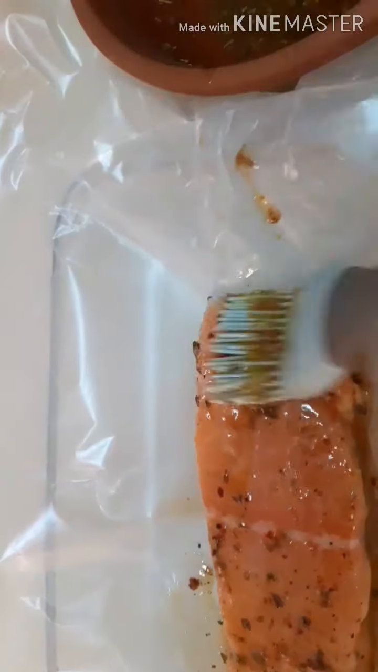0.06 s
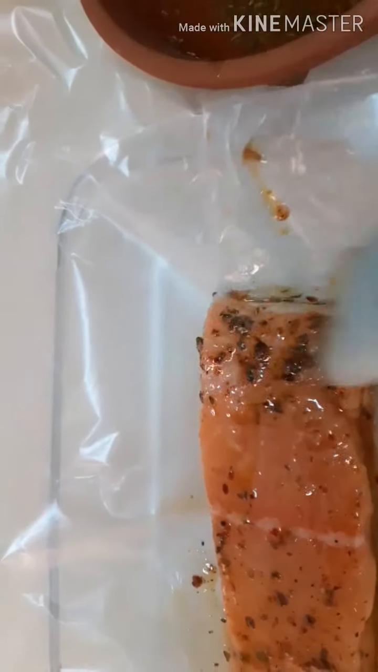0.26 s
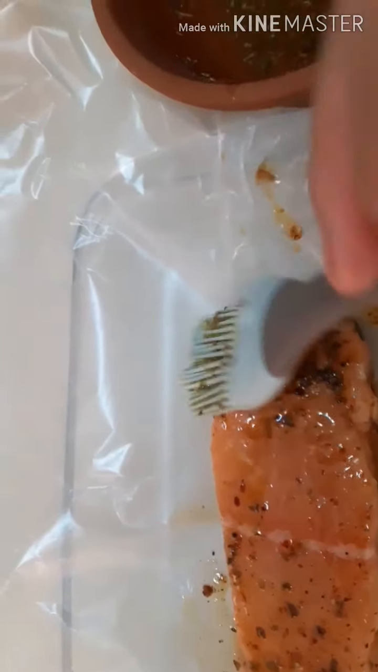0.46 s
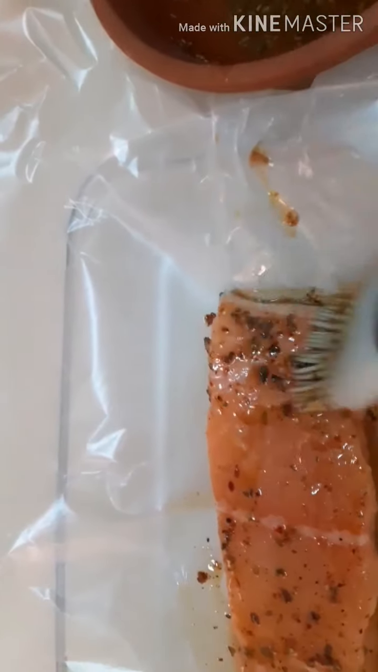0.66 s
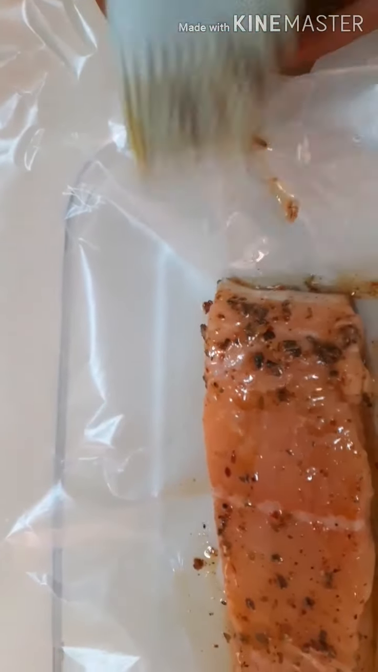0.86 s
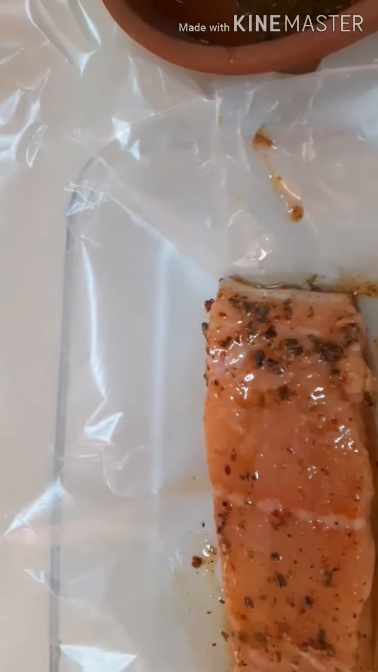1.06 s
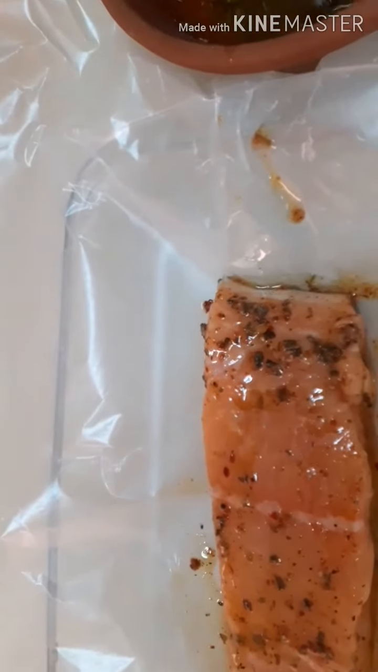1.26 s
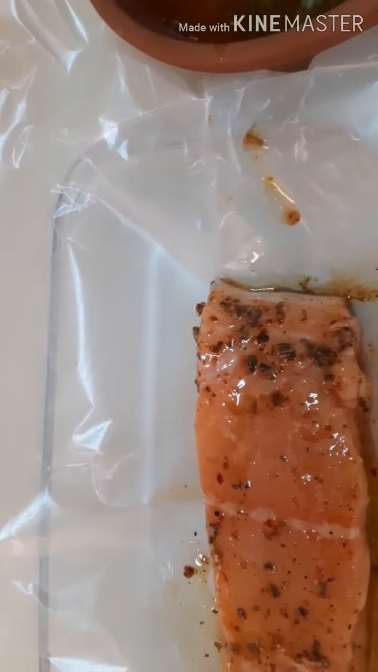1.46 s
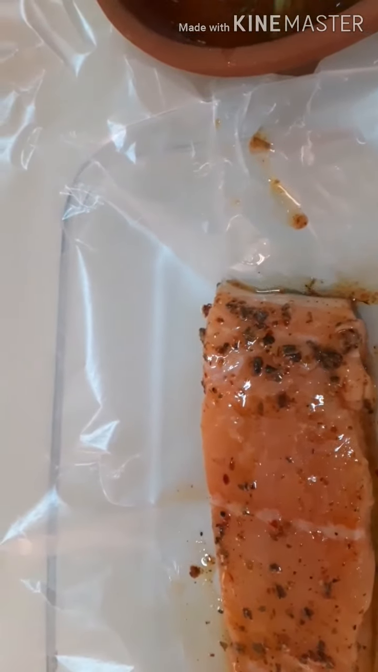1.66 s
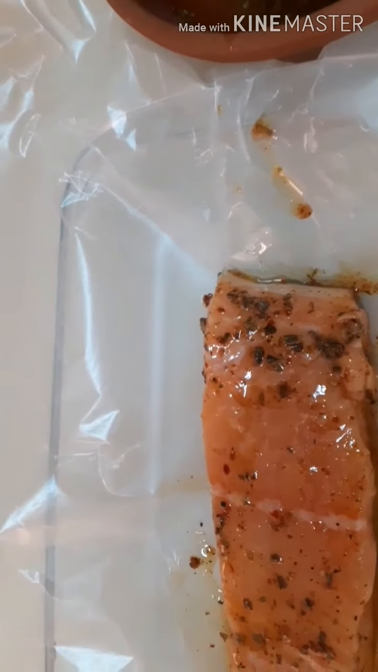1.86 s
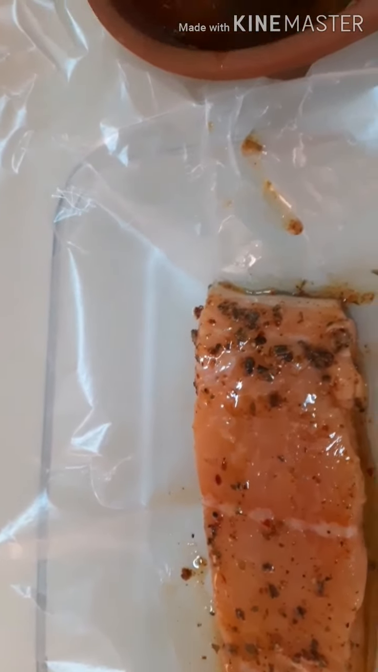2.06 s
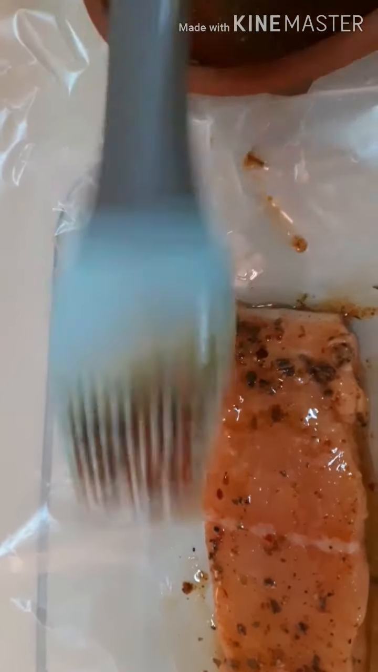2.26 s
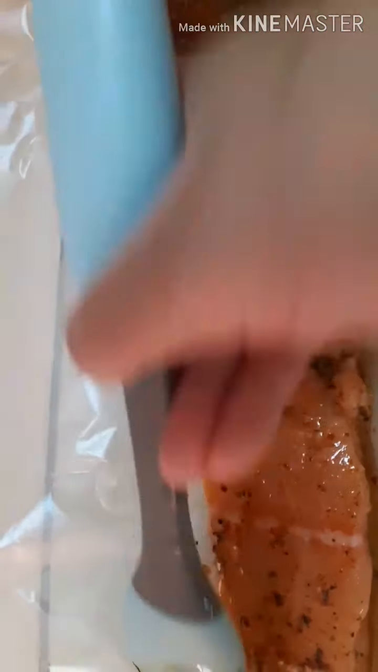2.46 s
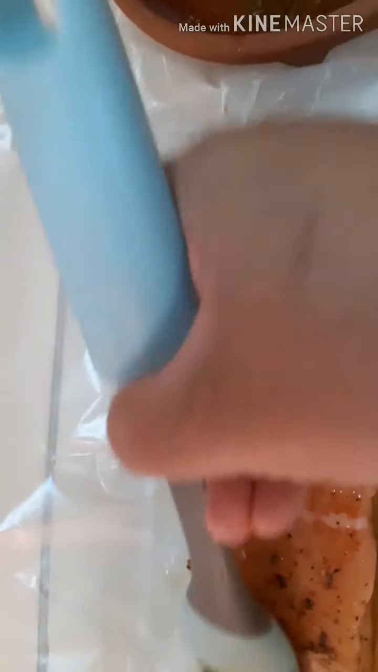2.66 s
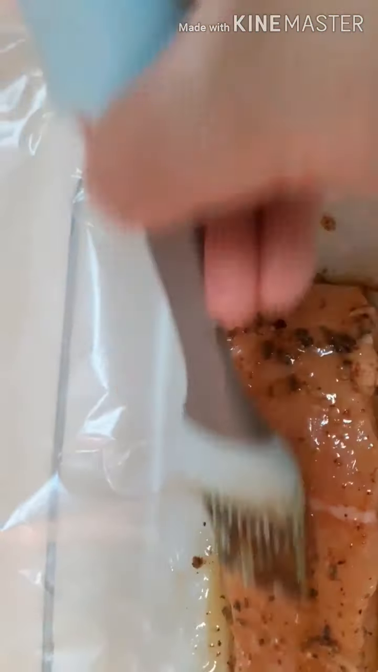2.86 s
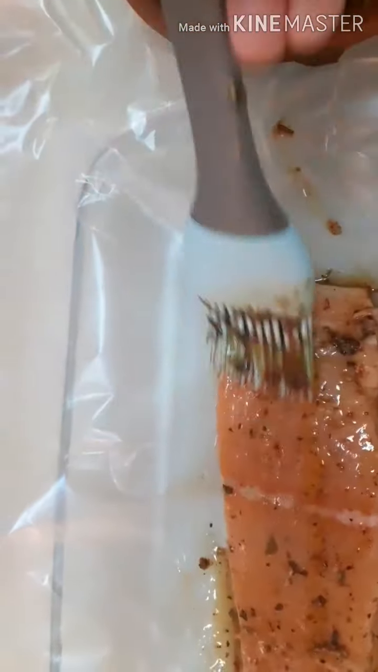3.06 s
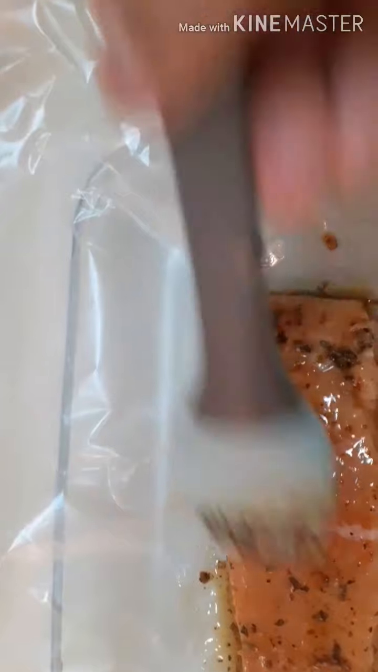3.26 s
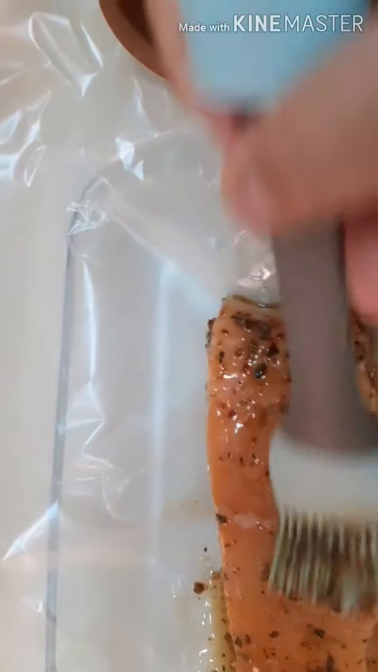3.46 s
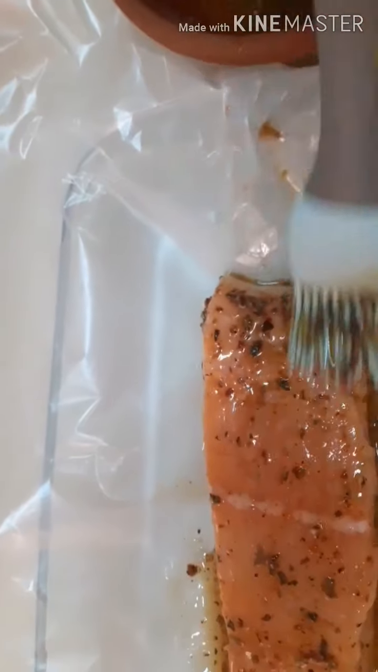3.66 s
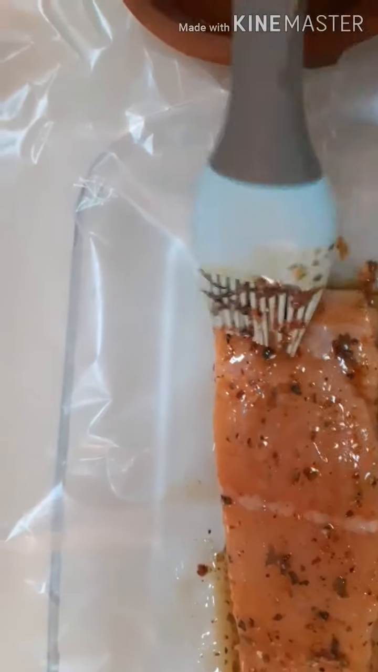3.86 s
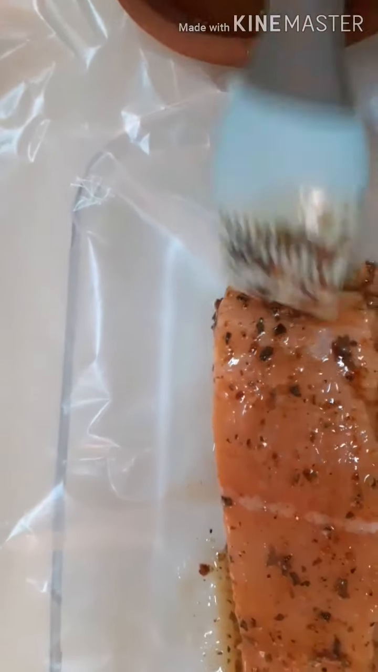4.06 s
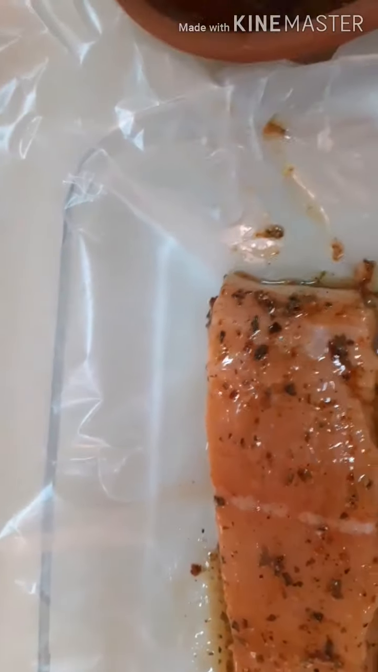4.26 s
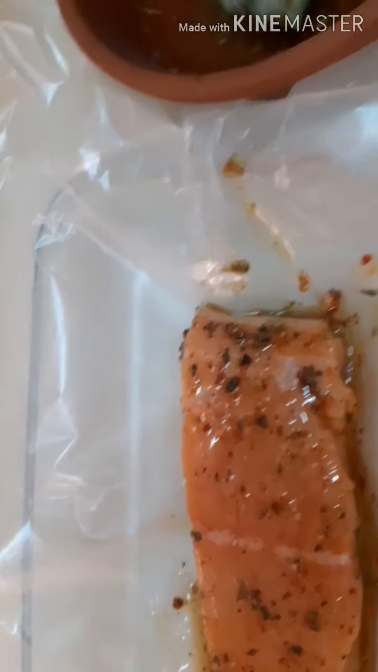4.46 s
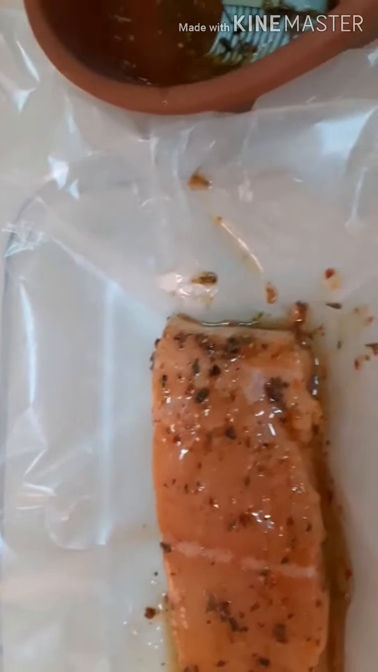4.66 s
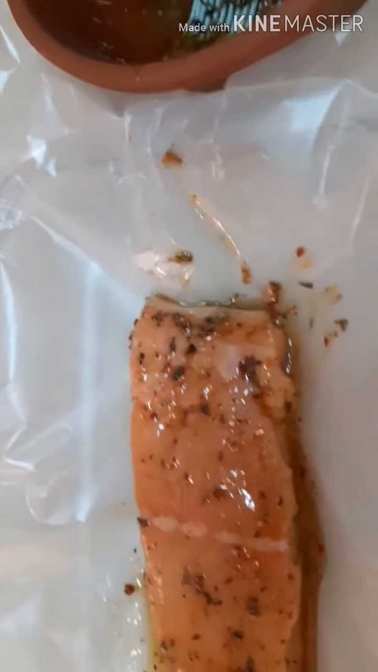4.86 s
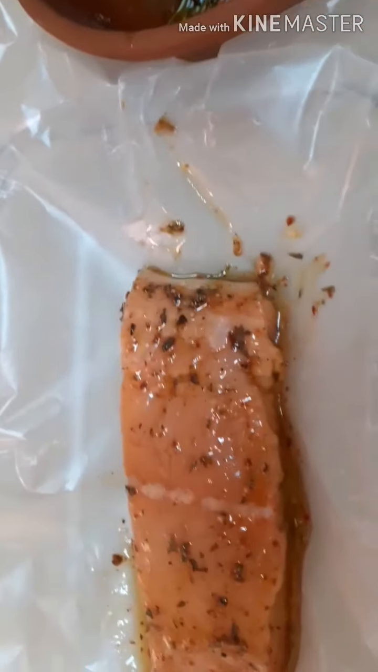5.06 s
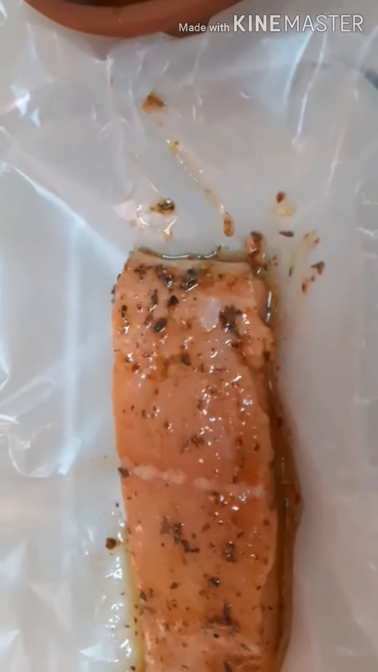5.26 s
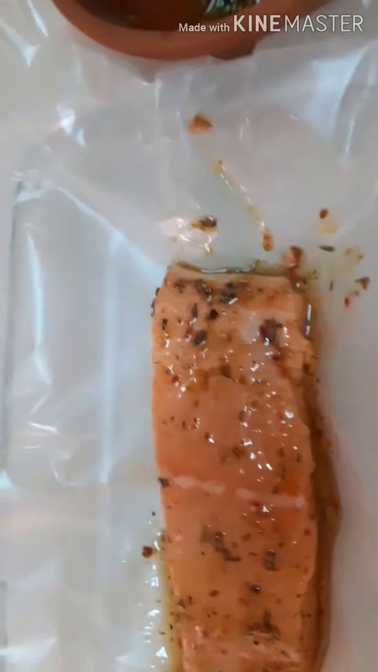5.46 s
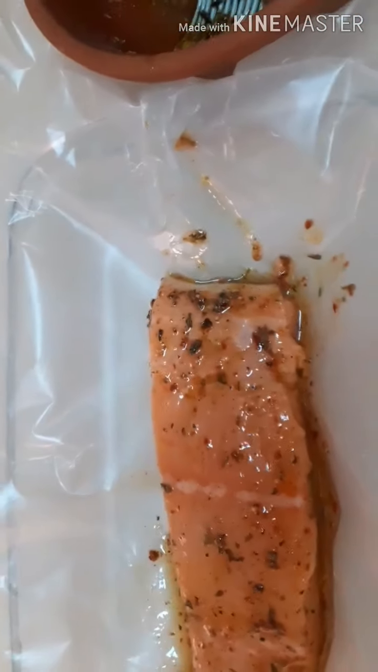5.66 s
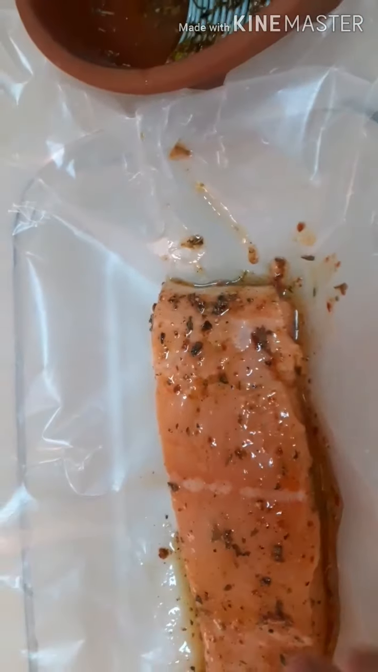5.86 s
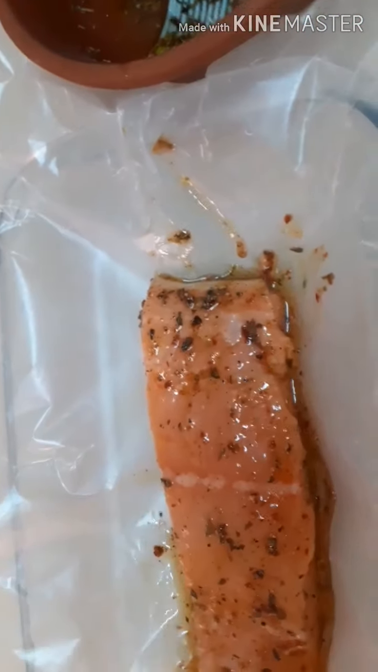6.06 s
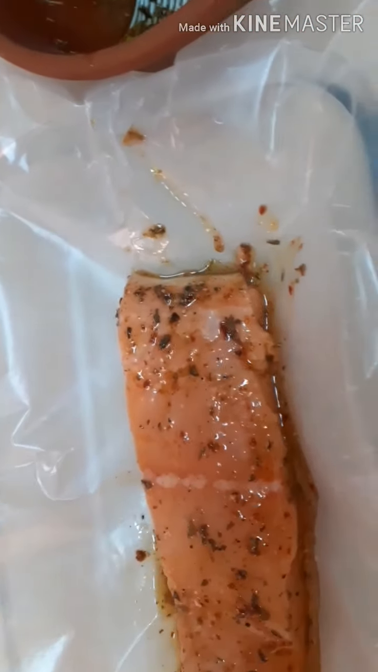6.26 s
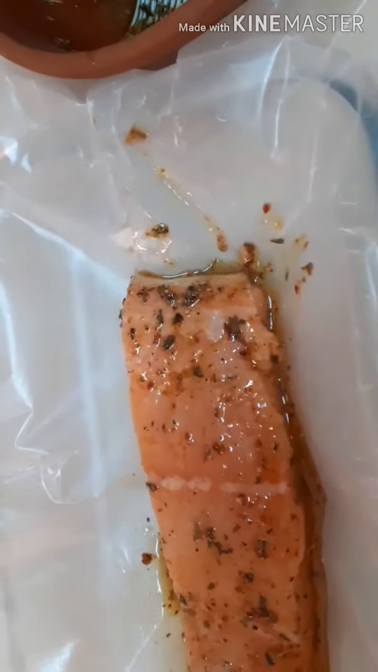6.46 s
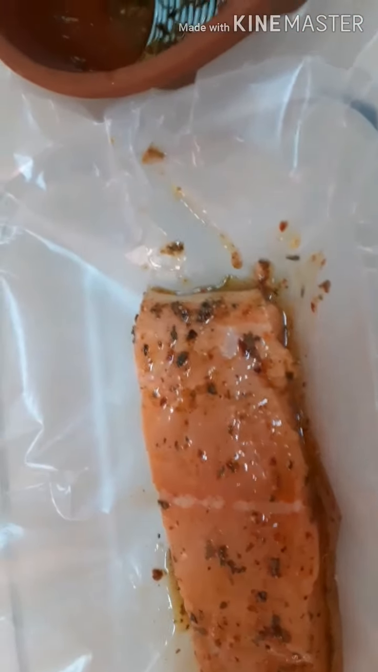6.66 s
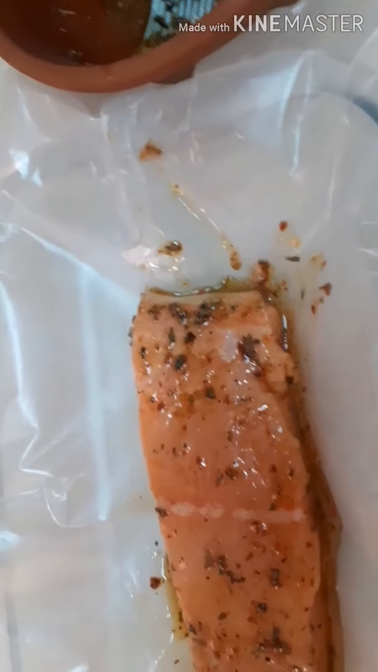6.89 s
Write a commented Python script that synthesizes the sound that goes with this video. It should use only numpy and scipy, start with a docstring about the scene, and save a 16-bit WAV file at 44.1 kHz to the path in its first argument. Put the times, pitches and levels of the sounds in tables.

```python
"""Brushing a fish fillet on plastic film

A silicone brush dabs marinade on a fillet; the film under it crinkles by random creasing and snaps by buckling.
Slaps and thuds are short noise bursts; the clay bowl that receives the brush rings as a sum of damped modes.
Tugs then pull the film along, as crackle and low rumble. Small bubbles ring, and an appliance hums below.
A close phone hears it in a small hard room; its right microphone port resonates near 2 kHz."""
import sys
import numpy as np
from scipy import signal
from scipy.fft import rfft, irfft
from scipy.io import wavfile
from scipy.ndimage import uniform_filter1d

SR = 44100
rng = np.random.default_rng(int(sys.argv[2]) if len(sys.argv) > 2 else 0)


def unload_audio(sound):
    """Save the sound as a 16-bit wav file, at the path given as the first command line argument."""
    columns = np.transpose(np.atleast_2d(sound))
    # keep every value between -1 and 1, then stretch to whole-number steps
    steps = np.round(np.clip(columns, -1, 1) * 32767)
    wavfile.write(sys.argv[1], SR, steps.astype(np.int16))


N = 305348
T = np.arange(N) / SR  # time in s

# spectrum of sliding film: f/Hz, level/dB
SLIDING_FILM = [(60, -27), (500, 1.5), (1000, 5), (1700, 1.5), (3000, 0.5), (6000, -7), (9000, -3),
                (13000, -6), (16000, -0.5)]


def brushing(folds_db=-4):
    """Stick and slip: bristles drag over the wet fillet and crumple the film beside it."""
    # strokes that crease the film: firmest at t/s, lead-in/s, trail/s, level/dB, treble gain/dB
    stroke_rows = [(0.189, 0.12, 0.11, -39.5, -12), (0.60, 0.15, 0.037, -49.5, -1.5),
                   (2.66, 0.14, .16, -46, 1.5), (3.07, 0.024, 0.14, -63.5, -1), (3.67, 0.13, 0.12, -47, -2)]
    crackle = mottle(creases(per_s=980, spread_db=2.0, hiss_db=4.0), depth_db=2.5)
    crackle = crackle + undb(folds_db) * small_folds(per_s=100, spread_db=39)
    strokes = 0
    for s, lead_s, trail_s, db, treble_db in stroke_rows:
        strokes = strokes + brighten(crackle, treble_db) * press(s, lead_s, trail_s, db)
    return tint(strokes, SLIDING_FILM)


def press(s, lead_s, trail_s, db, touch_db=-15, lift_db=-13.5, edge_s=0.0049):
    """Friction follows load: pressure grows from first contact to its firmest, eases, and the bristles lift."""
    swell_db = np.interp(T, [s - lead_s, s, s + trail_s], [touch_db, 0, lift_db])
    outside_s = np.maximum(np.maximum(s - lead_s - T, T - s - trail_s), 0)
    # the bristles take a moment to bend at either end
    return undb(db + swell_db) * np.exp(-2 * outside_s / edge_s)


def creases(per_s, spread_db, hiss_db, even_s=0.02, lag_s=0.00018):
    """Shot noise: countless creases of uneven size, each from its own spot, over the hiss of sliding."""
    chance, size, place = rng.random(N), rng.exponential(size=N), rng.standard_normal(N)
    strength = undb(spread_db * np.minimum(size, 4))
    clicks = (chance < per_s / SR) * strength * rng.choice([-1, 1], N)
    # the place of a crease shifts its arrival at the left port
    arrival = np.clip(np.arange(N) + np.round(place * lag_s * SR).astype(int), 0, N - 1)
    left = np.bincount(arrival, clicks, N)
    x = unit(np.array([left, clicks])) + undb(hiss_db) * rng.standard_normal((2, N))
    # the hand feeds in energy evenly: a big crease relieves its neighbours
    power = uniform_filter1d(x[1] ** 2, int(even_s * SR))
    return x / np.sqrt(power + 1e-9)


def small_folds(per_s, spread_db, settle_s=0.00097, size=512):
    """Random buckling: now and then a small fold flips among the creases and shivers with its own colour."""
    chance, strength = rng.random(N), rng.random(N)
    flips = (chance < per_s / SR) * undb(spread_db * strength)
    shiver = convolve(flips, np.exp(-T[:size] / settle_s))
    return unit(mottle(shiver * rng.standard_normal((2, N)), depth_db=3.5))


def mottle(x, depth_db):
    """Facets of many sizes: the bands up to 11 kHz vary in level independently from crease to crease."""
    out = 0
    for hz in 1000 * 2. ** np.arange(4):
        # the lowest band reaches down to zero, the next three are an octave wide
        band = signal.filtfilt(*signal.butter(3, hz * np.sqrt(2), fs=SR), x)
        out = out + band * undb(depth_db * walk(per_s=160))
        x = x - band
    return out + x


def snaps(shiver_db=-10, lag_s=.0001, onset_s=0.0011, facet_db=2.5, size=2048):
    """Buckling: a fold flips with a click and the film around it shivers."""
    # big folds: t/s (the click follows 1 ms later), relative level/dB, brightness/dB, settling time/s
    # the first cluster of each stroke is the brush landing; those after 5.8 s come from the pull
    fold_rows = [(0.085, -24.5, -4, 0.0055), (0.141, -21, 2.5, 0.0029), (0.156, -16, 2, 0.0054),
                 (0.164, -14.5, -2, 0.012), (0.174, -13, 2.5, 0.01), (0.191, -4.5, 3.5, 0.0028),
                 (0.199, -17.5, 10, 0.0014), (0.254, -22, 8, 0.012), (0.28, -14.5, 3.5, 0.0038),
                 (0.35, -37, 3.5, 0.005), (0.452, -16.5, -3, 0.0032), (0.48, -20, -1.5, 0.0021),
                 (0.521, -26.5, -7, .006), (0.604, -16, -4, 0.0016), (0.61, -16.5, 0.5, 0.0012),
                 (0.625, -15, 0, 0.0066), (0.662, -12.5, -0.5, 0.0039), (0.722, -20.5, -9, 0.002),
                 (0.729, -21, -7.5, 0.0018), (2.602, -17.5, 0, 0.011), (2.617, -15, 3.5, .003),
                 (2.623, -6, -2.5, 0.0049), (2.631, -14.5, -1, 0.0072), (2.638, -16.5, 11, 0.0041),
                 (2.714, -17, -10, 0.0037), (2.753, -21.5, -5, 0.0037), (2.815, -23.5, -4.5, 0.0024),
                 (2.989, -29.5, -3, 0.0061), (3.045, -11.5, 4, 0.0056), (3.096, -24, -8, 0.00098),
                 (3.145, -32, -5, 0.0022), (3.19, -34.5, -2, 0.0021), (3.455, -38.5, 2.5, 0.0055),
                 (3.553, -22.5, -2, 0.0032), (3.601, -27.5, -12, 0.0042), (3.63, -20.5, 1.5, 0.013),
                 (3.661, -18, 8.5, 0.0011), (3.691, -14, 6.5, 0.0019), (3.737, -17, 1, 0.0032),
                 (3.748, -21.5, -1, 0.009), (3.762, -18, -2.5, 0.0076), (3.962, -5.5, 0.5, 0.0017),
                 (4.007, -35, 12.5, .003), (4.025, -15.5, -2.5, .002), (5.907, -18, 3, .0023),
                 (5.936, -8, -5, 0.0023), (6.089, -9, 0, 0.0037), (6.155, -6, -11, 0.0024),
                 (6.177, -6, 0.5, 0.002), (6.205, -6.5, -14, 0.0019), (6.265, -8.5, -12, 0.0022),
                 (6.377, -15.5, 8, 0.0051), (6.572, -19.5, 8, .0023), (6.605, -17, -27, .0023),
                 (6.646, -26.5, 1.5, 0.0054), (6.725, -15.5, -4, 0.0023), (6.801, -22, -11, 0.0029)]
    # spectrum of a snapping fold: f/Hz, level/dB
    fold_colour = [(40, -25.5), (220, -1), (550, 0.5), (900, 3.5), (1400, 6), (2100, 1.5), (3200, -1),
                   (6500, -7), (9000, -9.5), (13000, -15.5), (16000, -14)]
    body_db, scatter_db = -3.5, 1.5  # mean fullness near 1 kHz, and its standard deviation
    out, t = np.zeros((2, N)), np.arange(-size, size) / SR
    hz = np.geomspace(300, 14000, 60)
    for s, db, bright_db, settle_s in fold_rows:
        shiver = rng.standard_normal((2, 2 * size)) * undb(3.66 * rng.standard_normal(2 * size))
        # short soft onset, then exponential decay
        envelope = np.exp(-np.maximum(t / max(settle_s, 1e-4), -t / onset_s))
        x = undb(shiver_db) * shiver * envelope
        # folds lie all around the fillet, so the click reaches either port first
        x[0, size + int(rng.normal() * lag_s * SR)] += 2
        x[1, size] += 2
        # fullness varies at random from fold to fold, apart from its brightness
        full_db = body_db + scatter_db * rng.normal()
        slope_hz = [300, 1100, 2100, 5500, 14000]
        slope_db = [0.22 * full_db, full_db, 0, 0.92 * bright_db, 1.87 * bright_db]
        slope = np.interp(np.log(hz), np.log(slope_hz), slope_db)
        # each facet has a resonance of its own
        octaves = np.log2(hz / 4500) - rng.uniform(-1.47, 1)
        facet = facet_db * np.exp(-octaves ** 2 / 0.057)
        snap = convolve(x, colour(np.c_[hz, slope + facet], size=512))
        add(out, s + 0.001017 - size / SR, undb(db) * snap)
    return tint(out, fold_colour) * undb(-8.5)


def slaps(rise_s=.002, fade_s=.008, size=4096):
    """Staggered impacts: the wet bristles land one after another and smack on the fillet."""
    # the wet brush slaps down: t/s, level/dB
    slap_rows = [(2.622, -27.5), (3.047, -30.5), (3.963, -25)]
    # spectrum of the smack: f/Hz, level/dB
    wet_bristles = [(200, -7), (450, -9), (700, 0), (1150, 3.5), (1600, -10.5), (2600, -10), (6000, -26)]
    out, t = np.zeros((2, N)), T[:size]
    for s, db in slap_rows:
        envelope = (1 - np.exp(-t / rise_s)) * np.exp(-t / fade_s)
        add(out, s, undb(db) * rng.standard_normal((2, size)) * envelope)
    return tint(out, wet_bristles)


def thuds(fade_s=0.012, size=4096):
    """Heavy damping: the flesh takes a blow without ringing, as a brief, dull thump."""
    # soft blows on the fillet: t/s, level/dB
    thud_rows = [(0.192, -42.5), (2.623, -32.5), (2.643, -38.5), (2.714, -48), (3.964, -49), (6.112, -26.5)]
    # spectrum of the damp flesh on the counter: f/Hz, level/dB
    flesh = [(50, -26.5), (130, -15), (260, 1.5), (420, -10), (700, -15), (1500, -25)]
    out = np.zeros((2, N))
    for s, db in thud_rows:
        add(out, s, undb(db) * rng.standard_normal(size) * np.exp(-T[:size] / fade_s))
    return tint(out, flesh)


def pulling(folds_db=-1):
    """Crackling friction: the film creases in little avalanches and its load rumbles over the counter."""
    # tugs on the film: start t/s, hold/s, level/dB, treble gain/dB, rumble level against the film/dB
    tug_rows = [(5.707, .17, -55, 3.5, -10), (5.887, 0.19, -38.5, 5.5, 0.5), (6.047, 0.044, -32, -3.5, -10),
                (6.132, 0.031, -43, 8.5, -3), (6.187, 0.084, -36, 2.5, -7), (6.308, 0.11, -38.5, 2.5, -11),
                (6.502, 0.088, -47.5, 1, 2.5), (6.724, 0.02, -35, 3.5, 1), (6.797, 0.035, -47.5, 4, 5.5)]
    # spectrum of the dragged load: f/Hz, level/dB
    load_colour = [(20, -50), (50, -17), (100, 2), (200, -7), (320, 3), (480, -9), (750, -2.5), (1300, -11),
                   (3000, -34)]
    crackle = creases(per_s=1200, spread_db=1.5, hiss_db=-2.5)
    crackle = mottle(crackle, depth_db=4.5) * undb(3.2 * walk(per_s=110))
    crackle = crackle + undb(folds_db) * small_folds(per_s=60, spread_db=12)
    rub = creases(per_s=300, spread_db=1.5, hiss_db=-9)
    film, load_gain = 0, 0
    for s, hold_s, db, treble_db, rumble_db in tug_rows:
        gain = tug(s, hold_s, db)
        film = film + gain * brighten(crackle, treble_db)
        load_gain = load_gain + gain * undb(rumble_db)
    return tint(film, SLIDING_FILM) + tint(rub * load_gain, load_colour)


def tug(s, hold_s, db, grip_s=0.023, sag_db_per_s=4, release_s=0.044):
    """Driven, then free motion: a tug takes hold, slackens slowly, and the film glides to rest."""
    age = np.maximum(T - s, 0)
    grip = np.minimum(age / grip_s, 1)
    glide = np.exp(-np.maximum(age - hold_s, 0) / release_s)
    return undb(db - sag_db_per_s * age) * grip * glide


def bowl(knock_db=-4, knock_s=0.01, ring_db=-13, size=16384):
    """Modal ringing: the handle bounces on the rim and excites the clay, which the marinade damps."""
    # knocks of the handle as it is laid down, and when a tug jolts it: t/s, relative level/dB
    knock_rows = [(4.742, -33.5), (4.751, -45), (4.761, -35.5), (4.771, -39), (6.757, -21), (6.831, -35)]
    # modes of the clay bowl: f/Hz, relative level/dB, 60 dB decay time/s
    modes = [(300.7, 3, 0.3), (381, 3, 0.19), (489, 2.5, 0.13), (590, -16, .08), (756, 1, 0.11),
             (923, -3, 0.059), (1020, -12, 0.057), (1970, -13, 0.025)]
    # spectrum of the knock itself: f/Hz, level/dB
    handle = [(100, -10), (300, 8), (900, 8.5), (1500, -11.5), (2500, -17.5), (4500, -25), (7000, -32),
              (12000, -44)]
    rings, knocks, t = np.zeros((2, N)), np.zeros((2, N)), T[:size]
    for s, db in knock_rows:
        ring = 0
        for hz, mode_db, t60 in modes:
            phase = rng.uniform(0, 2 * np.pi)
            ring = ring + undb(mode_db - 60 * t / t60) * np.sin(2 * np.pi * hz * t + phase)
        add(rings, s, undb(db + ring_db) * ring * (1 - np.exp(-t / 0.0013)))
        add(knocks, s, undb(db + knock_db) * rng.standard_normal(size) * np.exp(-t / knock_s))
    return rings + tint(knocks, handle)


def grazing():
    """Weak friction: the film whispers when it is barely stirred."""
    # light touches: strongest at t/s, lead-in/s, trail/s, level/dB
    graze_rows = [(1.02, .04, 0.041, -72.5), (1.32, 0.17, 0.19, -71), (4.68, 0.33, 0.18, -77),
                  (5.17, 0.23, 0.21, -76.5)]
    # spectrum of the whisper: f/Hz, level/dB
    grazed_film = [(500, -20), (2000, 13), (3500, 2), (7000, 1), (9000, 4.5), (15000, -25)]
    whisper = creases(per_s=400, spread_db=15.0, hiss_db=2)
    return tint(whisper * sum(press(*row) for row in graze_rows), grazed_film)


def bubbles(cycles=7, size=1024):
    """Damped oscillators: each bubble that bursts in the marinade rings for a few cycles."""
    # bursts: t/s, f/Hz, relative level/dB
    pop_rows = [(.802, 6200, -54.5), (4.618, 5160, -48)]
    out, t = np.zeros((2, N)), T[:size]
    for s, hz, db in pop_rows:
        add(out, s, undb(db + 4) * np.sin(2 * np.pi * hz * t) * np.exp(-hz * t / cycles))
    return out


def kitchen(x, near_db=-7, near_t60=0.038, room_db=-17, room_t60=0.32, wall_hz=11000, size=32768):
    """Reverberation: quick echoes off the counter, then the decaying tail of a small hard room."""
    t = T[:size]
    near = diffuse(size) * undb(-60 * t / near_t60) * (t > .0007)
    far = lowpass(diffuse(size), wall_hz) * undb(-60 * t / room_t60) * (t > .006)
    echoes = undb(near_db) * unit(near) + undb(room_db) * unit(far)
    return x + convolve(x, echoes / np.sqrt(size))


def diffuse(size, alike_hz=900):
    """Diffuse field: noise comes from all sides, and long waves reach both ports alike."""
    x = rng.standard_normal((2, size))
    bass = lowpass(x, alike_hz)
    return x - bass + np.sqrt(2) * bass.mean(axis=0)


def appliance(noise_db=-51.0, apart=0.43, waver_db=1):
    """Tones and broadband noise: a motor hums somewhere in the room over a soft rush of air."""
    # spectrum of the rush in the room: f/Hz, level/dB
    air_colour = [(20, -51), (42, -13), (85, -12.5), (125, 2.5), (180, -7.5), (310, 1), (450, -11.5),
                  (600, -16), (900, -16.5), (1300, -26), (2000, -31), (3000, -43.5), (4000, -39.5),
                  (5200, -52)]
    # motor tones: f/Hz, amplitude/dB
    hum_rows = [(120, -60), (320, -60.5)]
    # one part common to both ports, one separate
    air = tint(rng.standard_normal(N) + apart * rng.standard_normal((2, N)), air_colour)
    waver = walk(per_s=7)  # moves the level of the air and, in rad, the phase of the hum
    hum = sum(undb(db) * np.sin(2 * np.pi * hz * T + waver) for hz, db in hum_rows)
    return undb(noise_db + waver_db * waver) * unit(air) + hum


def walk(per_s):
    """Random modulation: independent normal levels joined by straight lines."""
    knots = np.arange(0, T[-1], 1 / per_s)
    levels = rng.standard_normal(N)
    return np.interp(T, knots, levels[:len(knots)])


def undb(db):
    """Level to amplitude: decibels to gain."""
    return 10 ** (np.asarray(db) / 20)


def unit(x):
    """Normalised power: scale to rms 1."""
    return x / np.sqrt(np.mean(x ** 2))


def convolve(x, response):
    """Linear superposition: pass a sound through an impulse response."""
    return signal.fftconvolve(np.atleast_2d(x), np.atleast_2d(response), axes=-1)[:, :N]


def colour(points, size=4096):
    """Minimum phase: causal impulse response with the given (f/Hz, level/dB) spectrum."""
    hz, db = np.transpose(points)
    bins = np.maximum(np.arange(size // 2 + 1) * SR / size, 1)
    level_db = np.interp(np.log(bins), np.log(hz), db)
    cepstrum = irfft(np.log(undb(level_db)))
    # folding the cepstrum onto positive times makes the response causal
    cepstrum[1:size // 2] *= 2
    cepstrum[size // 2 + 1:] = 0
    return irfft(np.exp(rfft(cepstrum)))


def tint(x, points):
    """Spectral shaping: colour a white sound and keep its power."""
    response = colour(points)
    return convolve(x, response / np.linalg.norm(response))


def lowpass(x, hz):
    """First-order absorption: a gentle low-pass."""
    return signal.lfilter(*signal.butter(1, min(hz, .45 * SR), fs=SR), x)


def brighten(x, treble_db, split_hz=3200):
    """Spectral balance: raise or lower the treble; sharper creases have more of it."""
    low = signal.filtfilt(*signal.butter(2, split_hz, fs=SR), x)
    return low + undb(treble_db) * (x - low)


def add(out, s, x):
    """Superposition: mix a sound in at time s."""
    i = max(int(s * SR), 0)
    out[:, i:i + x.shape[-1]] += x[..., :N - i]


def scene():
    """Superposition of sources: everything on the counter sounds into the room, over the appliance."""
    film = brushing() + grazing() + pulling() + snaps()
    fillet = slaps() + thuds()
    return kitchen(film + fillet + bowl() + bubbles()) + appliance()


def record(dry, top_hz=15600):
    """Port resonance and saturation: the right port rings; the phone adds hiss, rounds peaks, cuts the top."""
    # response of the right microphone port over the left one: f/Hz, level/dB
    port = [(60, 1.5), (400, 4.5), (800, 4), (1200, 9), (1600, 17.5), (2050, 24.5), (2600, 14), (3200, 5.5),
            (4000, 13.5), (4900, 10.5), (7000, 9), (10000, -7), (12500, 5), (16000, -3.5)]
    ports = np.vstack([dry[0], convolve(dry[1], colour(port))[0]])
    hiss = undb(-80) * rng.standard_normal((2, N))
    top_cut = signal.ellip(8, .2, 70, top_hz, fs=SR, output="sos")
    return signal.sosfilt(top_cut, np.tanh(ports + hiss))


dry = scene()
out = record(dry)
unload_audio(out)
```